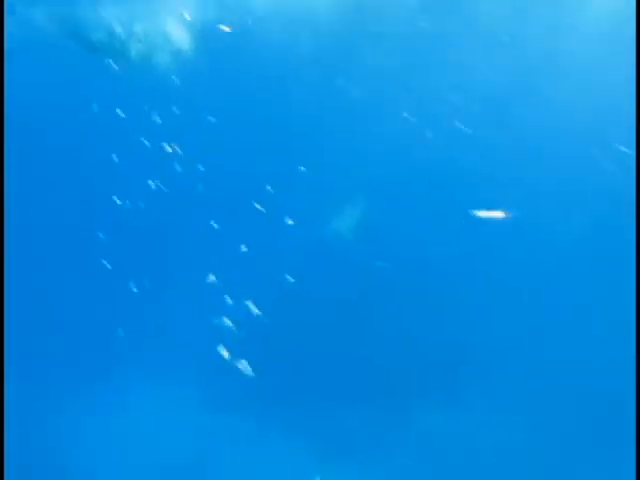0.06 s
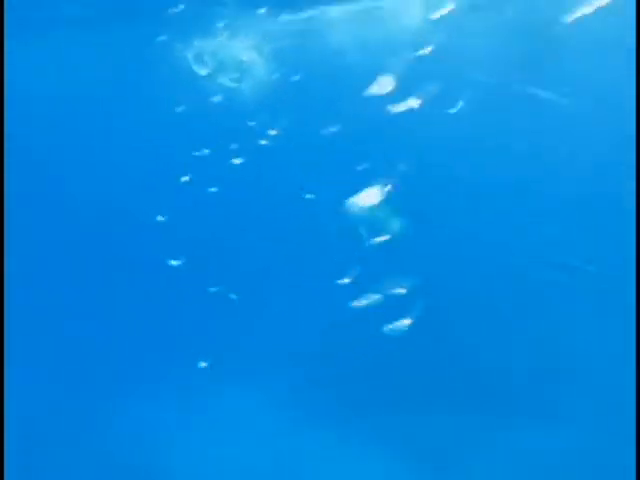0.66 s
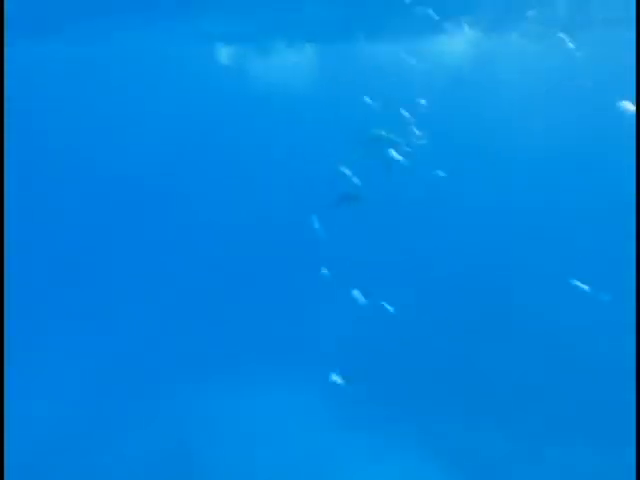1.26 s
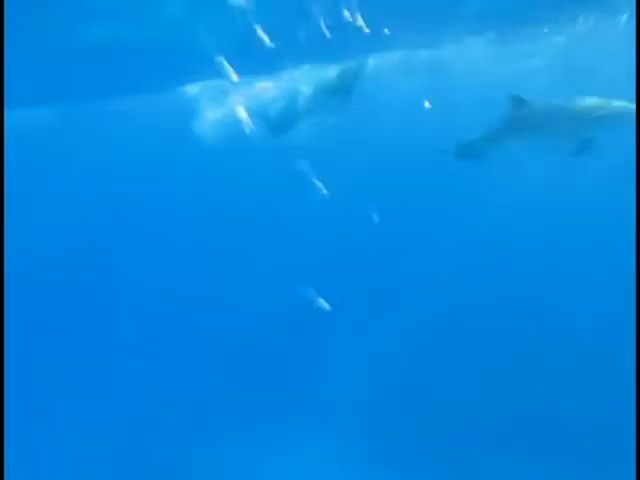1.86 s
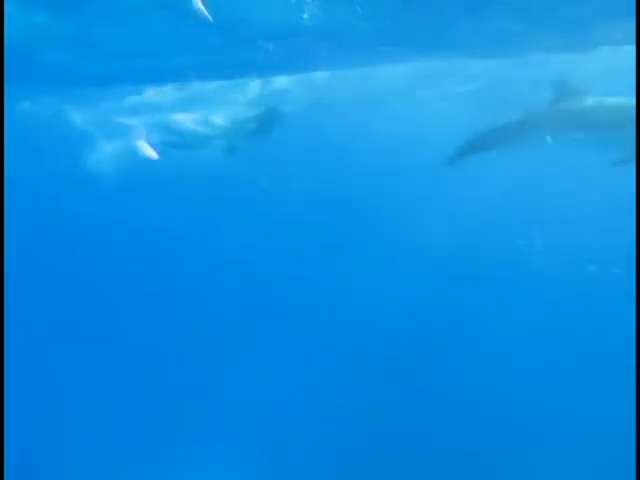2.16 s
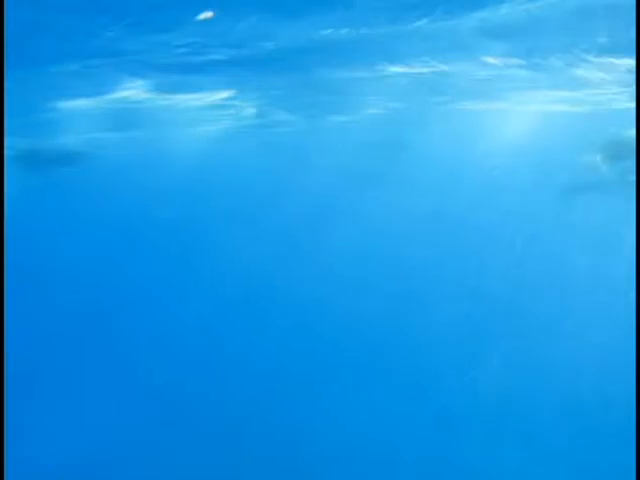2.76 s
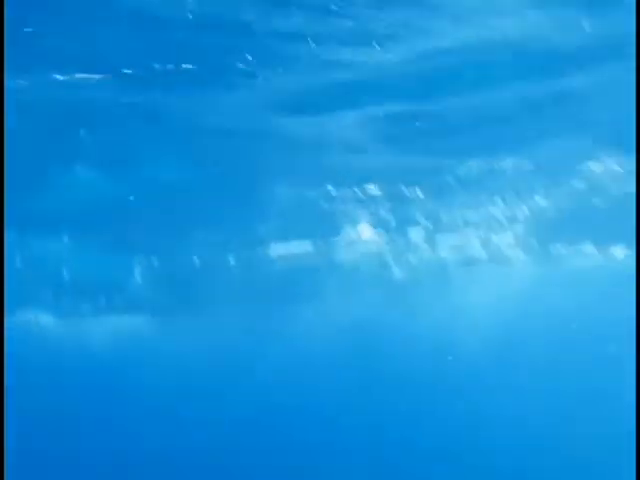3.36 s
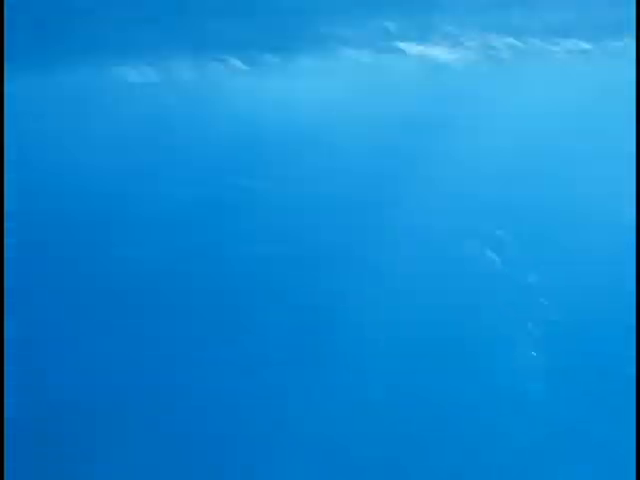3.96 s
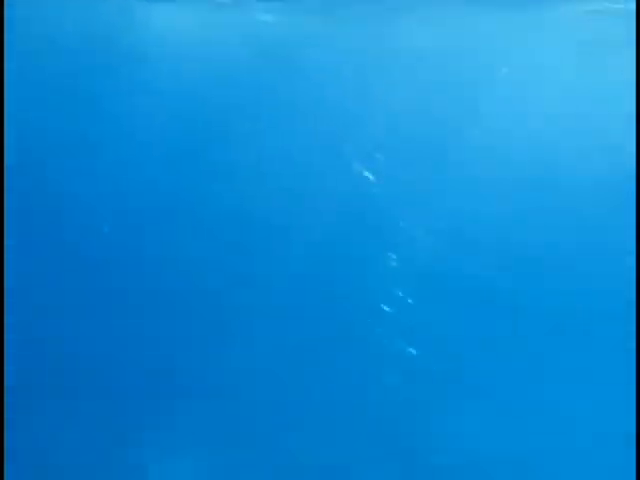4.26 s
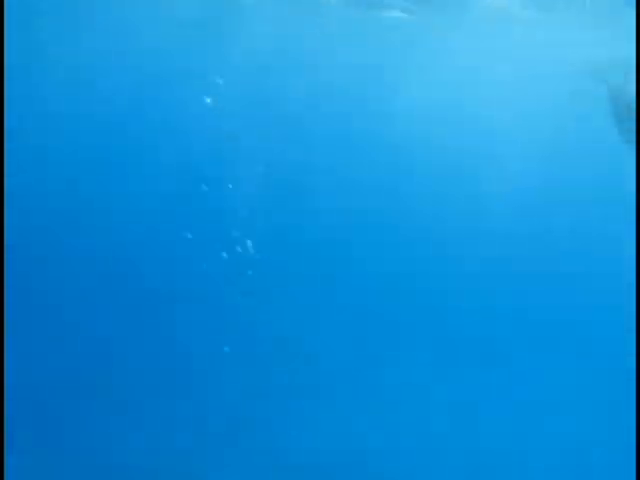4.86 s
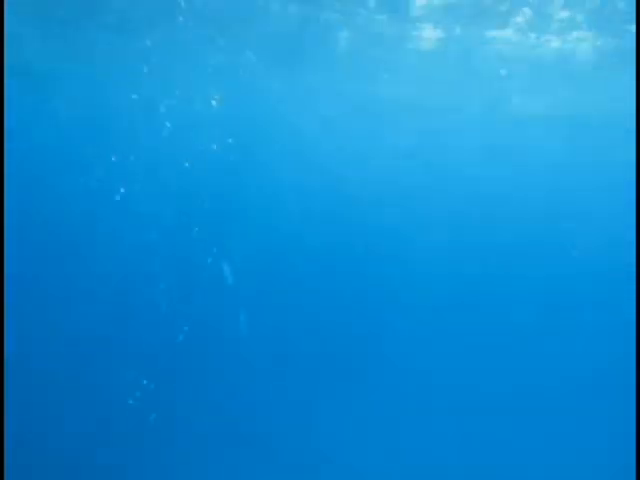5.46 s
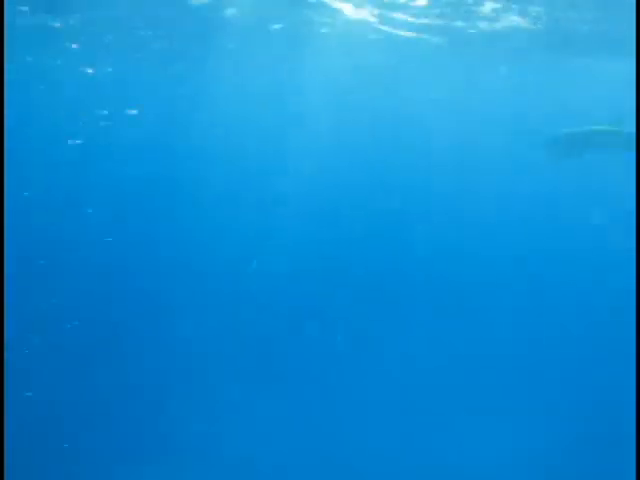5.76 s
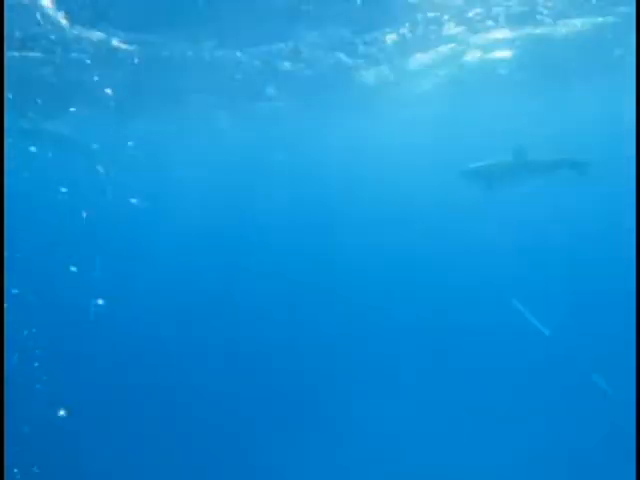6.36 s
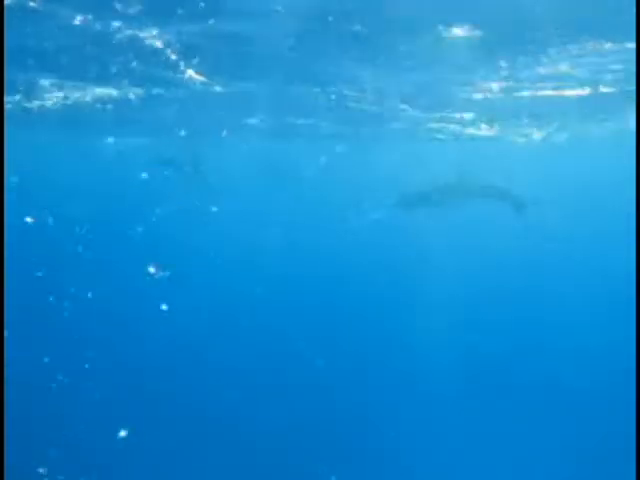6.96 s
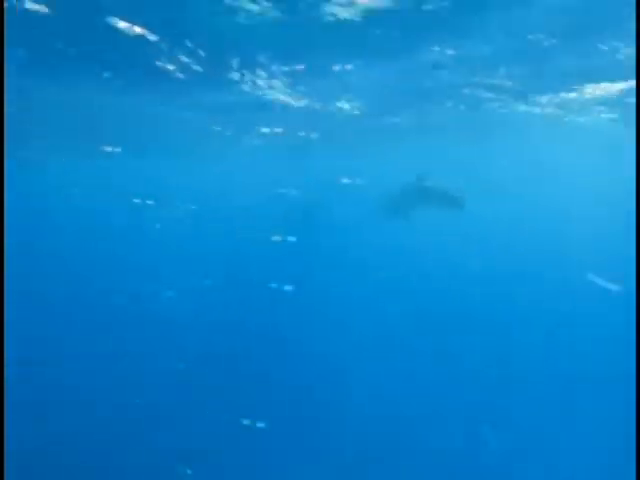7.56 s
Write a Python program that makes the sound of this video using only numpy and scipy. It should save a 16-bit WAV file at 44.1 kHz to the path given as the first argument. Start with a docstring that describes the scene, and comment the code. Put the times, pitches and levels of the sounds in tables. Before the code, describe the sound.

Just under the surface of the open sea, dolphins send out quick trains of sharp clicks with a few faint, thin whistles. Bubbles plop and drops crackle overhead against a steady wash and hiss. Past the middle, a swimmer's stroke churns the water close by in a loud, fizzing gurgle. Then it calms to softer bubbles and more clicks, all heard by a microphone in a watertight housing.

```python
"""Open sea, just under the surface, heard by a swimmer's camera microphone in a watertight housing.
Dolphins whistle and click, near and far; each click rattles briefly in the housing wall.
Bubbles ring, spray fizzes overhead, water slaps the housing and one stroke churns the sea close by.
Under it all lie the wash of the sea and the camera's own hiss, hum and thin whine."""
import sys
import numpy as np
from scipy import signal
from scipy.fft import rfft, irfft
from scipy.io import wavfile
from scipy.ndimage import uniform_filter1d

SR = 44100
rng = np.random.default_rng(int(sys.argv[2]) if len(sys.argv) > 2 else 0)


def digitize_waveform(pressure):
    """Quantize a signal to 16-bit integers and store it at the path in sys.argv[1].

    Rows of a 2-D input are taken as channels; values are limited to [-1, 1].
    """
    field = np.atleast_2d(pressure).T
    bounded = np.clip(field, -1, 1)
    quanta = np.round(bounded * 32767).astype(np.int16)
    wavfile.write(sys.argv[1], SR, quanta)


N = 340011
T = np.arange(N) / SR

# Spectra of the water. Each row: frequency in Hz, relative level in dB.
GURGLE = [(150, -24.5), (300, -9), (380, -5), (430, 0), (510, -10), (600, 0.5), (660, -5), (770, -12),
          (950, -9), (1150, -13.5), (1550, -14), (1900, -19.5), (2600, -32)]  # the low wash
HISS = [(600, -0.5), (950, 8.5), (1150, 4.5), (1520, 12.5), (1750, 6), (2000, 3), (3000, 4), (3900, 3),
        (4600, -1.5), (5000, 5), (5400, 1), (7000, -1.5), (8000, -7), (11000, -33)]  # the broad hiss above it
SPRAY = [(6000, -2), (7600, -5), (8300, 5), (9100, 1.5), (10000, 3), (11000, -6.5), (13000, -10),
         (16000, -11)]  # fine spray
SPURT = [(500, -5.5), (1400, -4.5), (2000, -4.5), (2800, 5), (4000, -1), (5300, 2.5), (7300, -1.5),
         (10000, -2.5), (16000, -23)]  # drops on the surface
CHURN = [(120, -8.5), (280, -7.5), (420, -1), (600, 5), (760, -3), (950, 9), (1200, -0.5), (1500, 10),
         (1950, -16.5), (2800, -1.5), (4300, -19), (5050, -6), (5700, -27), (10000, -4)]  # water churned close by
# Spectra of a click's three parts. Each row: frequency in Hz, relative level in dB.
CLICK_BODY = [(500, -58), (1000, -4), (1500, 11.5), (2100, -2), (2900, 6.5), (3350, 7.5), (3900, 5.5),
              (5200, 6), (6800, 4.5), (9000, -18), (16000, -51)]
CLICK_BRIGHT = [(3000, -28), (5500, -10.5), (7000, -3), (8500, 10.5), (10500, 8.5), (12500, 0), (16000, 1)]
CLICK_EDGE = [(7000, -39), (10500, 0), (12300, 9), (16000, 6)]  # strongest above 12 kHz
# Resonances of the housing wall. Each entry: frequency in Hz.
WALL_HZ = [3320, 3850, 4270]


def undb(db):
    """Decibels to gain."""
    return 10 ** (np.asarray(db) / 20)


def unit(x):
    """Scale to rms 1."""
    return x / np.sqrt(np.mean(x ** 2))


def curves(table):
    """Each column after the first (time in seconds), joined by straight lines."""
    s, *columns = np.transpose(table)
    return [np.interp(T, s, c) for c in columns]


def add(out, s, x):
    """Mix x into out from time s."""
    i = int(np.clip(s * SR, 0, N - 1))
    out[i:i + len(x)] += x[:N - i]


def colour(x, points, size=8192):
    """Causal filter through (Hz, dB) points, falling away outside them."""
    hz, db = np.transpose(points)
    f = np.maximum(np.arange(size // 2 + 1), 1) * SR / size
    octaves_outside = np.maximum(np.log2(hz[0] / f), 0) + np.maximum(np.log2(f / hz[-1]), 0)
    gain = undb(np.interp(np.log(f), np.log(hz), db) - 20 * np.minimum(octaves_outside, 2))
    cepstrum = irfft(np.log(gain))
    cepstrum[1:size // 2] *= 2  # fold to minimum phase
    cepstrum[size // 2 + 1:] = 0
    response = irfft(np.exp(rfft(cepstrum))) * np.hanning(2 * size)[size:]
    return signal.oaconvolve(x, response)[:len(x)]


def walk(rate):
    """Random drift with a spread near 1, turning rate times a second."""
    k = int(SR / rate)
    return uniform_filter1d(np.repeat(rng.standard_normal(N // k + 1), k), k)[:N]


def pops(rate, spread_db):
    """Random impulses, about rate a second, a few much larger than the rest."""
    fires = rng.random(N) < rate / SR
    size = np.minimum(rng.exponential(size=N), 4)
    return fires * undb(spread_db * size) * rng.choice([-1, 1], N)


def swell(start_s, attack_s, hold_s, fall_db_per_s):
    """Gain that builds up, holds, then dies away."""
    rise = np.clip((T - start_s) / attack_s, 0, 1) ** 2
    return rise * undb(-fall_db_per_s * np.maximum(T - start_s - attack_s - hold_s, 0))


def bubble(hz, t60, start_ratio, settle_s=0.0062, rise_s=0.00056):
    """A pocket of air rings and settles to its pitch as it leaves the surface."""
    t = np.arange(int(max(t60, .002) * SR)) / SR
    pitch = hz * (1 + (start_ratio - 1) * np.exp(-t / settle_s))
    envelope = np.exp(-np.log(1000) * t / t60) * (1 - np.exp(-t / rise_s))
    return np.sin(2 * np.pi * np.cumsum(pitch) / SR) * envelope


def swarm(lo_hz, hi_hz, cycles, spread_db, span_s, count):
    """Many small bubbles of random size, born at random moments."""
    out = np.zeros(N)
    for when, size, force, glide in rng.random((count, 4)):
        s = span_s[0] + when * (span_s[1] - span_s[0])
        hz = lo_hz * (hi_hz / lo_hz) ** size
        gain = undb(-spread_db * np.log(max(force, .03))) * rng.choice([-1, 1])
        add(out, s, gain * bubble(hz, cycles / hz, start_ratio=0.89 + 0.49 * glide))
    return out


def sea(rumble_db=1.7, gurgle_db=2.0, foam_db=1.9, hiss_db=4.5, spray_db=2.5, bubbly=0.11):
    """Open water all round: rumble, a wash with small bubbles, ringing foam, hiss and fine spray."""
    # The sea's rise and fall. Each row: time in seconds, then rumble, gurgle, foam, hiss and spray
    # in relative dB.
    levels = [(0, -59, -50.5, -52, -55, -55), (.75, -57.5, -48.5, -52, -57, -56),
              (1.4, -58, -52.5, -47, -58.5, -53), (1.9, -57, -55, -53, -55, -55.5),
              (2.2, -57.5, -52.5, -53, -56, -54), (2.5, -58.5, -50.5, -48, -56, -52.5),
              (2.9, -58.5, -51.5, -50.5, -53.5, -50), (3.13, -56, -48, -44.5, -49.5, -47.5),
              (3.35, -55.5, -56.5, -51.5, -50.5, -52.5), (3.8, -56, -51, -48.5, -50.5, -51.5),
              (4.25, -56.5, -53.5, -44, -48, -49.5), (4.8, -59, -40, -45.5, -51, -48.5),
              (5.22, -50.5, -46, -54, -51, -50), (5.4, -57, -53, -60.5, -58, -60),
              (5.63, -58, -49.5, -59, -54.5, -58.5), (6.1, -58.5, -59.5, -65.5, -54.5, -57.5),
              (7.25, -57.5, -52.5, -63.5, -55, -58.5), (7.71, -58.5, -56.5, -59.5, -58, -47.5)]
    # Spectra of the rumble and the foam. Each row: frequency in Hz, relative level in dB.
    rumble_spectrum = [(12, -37), (20, 2.5), (188, -6.5), (255, -8.5), (280, -6.5), (308, -16), (330, -18),
                       (430, -27), (730, -120)]
    foam_spectrum = [(1500, -21.5), (2000, -24), (2250, -6), (2480, 3), (2600, -5.5), (2850, 6), (3020, -5),
                     (3150, -16), (3330, 0.5), (3550, -12), (3800, -4), (4080, -19), (4290, -2),
                     (4700, -21)]
    rumble, gurgle, foam, hiss, spray = curves(levels)
    noise = rng.standard_normal((5, N))
    small = bubbly * unit(swarm(305.5, 1810, cycles=15, spread_db=5.8, span_s=(0, N / SR), count=1800))
    layers = (
        (noise[0], rumble_spectrum, rumble + rumble_db + 1.2 * walk(7.5)),
        (small + noise[1], GURGLE, gurgle + gurgle_db + 0.25 * walk(21)),
        (unit(pops(1200, 5.0)) + 1.7 * noise[2], foam_spectrum, foam + foam_db + 1.16 * walk(25.01)),
        (unit(pops(700, 4.6)) + noise[3] + small, HISS, hiss + hiss_db + 0.7 * walk(25)),
        (unit(pops(350, 1.3)) + 0.85 * noise[4], SPRAY, spray + spray_db + 1.6 * walk(31)))
    return sum(unit(colour(source, spectrum)) * undb(db) for source, spectrum, db in layers)


def far_clicks(rate=30, level_db=-62, ring_s=.001, body=0.19, size=256):
    """The rest of the pod ticks away in the distance."""
    wall = rng.standard_normal(size) * np.exp(-np.arange(size) / SR / ring_s)
    ticks = signal.oaconvolve(pops(rate, 1.7), wall)[:N]
    return undb(level_db) * unit(colour(ticks, CLICK_BRIGHT) + body * colour(ticks, CLICK_BODY))


def rattle(bright_db, body_db, edge_db, mode_hz, crossing_s=0.0016, ring_s=0.0019, fade_s=0.0087,
           tail=0.045, tail_s=0.0063, stir_db=-20, mode_q=7, mode_gain=1.95, size=512):
    """A sharp pulse bounces through the housing wall, rings one of its resonances and dies."""
    t = np.arange(size) / SR
    envelope = np.exp(-np.maximum(t - crossing_s, 0) / ring_s - t / fade_s) + tail * np.exp(-t / tail_s)
    bounces = rng.standard_normal(size) * envelope
    bright, body, edge = (colour(bounces, p, size=512) for p in (CLICK_BRIGHT, CLICK_BODY, CLICK_EDGE))
    body = body + mode_gain * signal.lfilter(*signal.iirpeak(mode_hz, mode_q, fs=SR), body)
    body_gain = undb(body_db) + undb(bright_db + stir_db)  # even a bright pulse stirs the lower modes
    parts = (bright, undb(bright_db)), (body, body_gain), (edge, undb(edge_db))
    return sum(gain * part / np.abs(part).max() for part, gain in parts)


def near_clicks(bright_db=2.5, body_db=1.5, edge_db=29.0):
    """The nearest dolphins' echolocation clicks strike the housing; the tone shifts as the beam turns."""
    # Trains of about twelve clicks a second. Each row: start in seconds, relative peak in dB.
    trains = [(0.0725, -23), (0.1615, -24), (0.2643, -22), (0.3683, -23.5), (0.469, -25), (0.484, -24),
              (0.5704, -20), (0.6561, -23.5), (0.6845, -28), (0.7563, -25), (0.787, -30), (0.896, -33),
              (0.9762, -20), (0.9971, -33), (1.055, -21), (1.1054, -33), (1.1343, -21), (1.2132, -21.5),
              (1.2938, -24.5), (1.3094, -32), (1.3738, -27.5), (1.4207, -31), (1.448, -27.5),
              (1.521, -27.5), (1.5394, -28), (1.5943, -25), (1.6576, -34), (1.6748, -25.5), (1.7564, -33),
              (1.845, -31), (1.956, -33.5), (2.0562, -33), (2.1338, -29), (2.2543, -33), (2.3521, -35),
              (2.4743, -32.5), (3.1941, -31.5), (3.3643, -30), (3.3997, -33), (3.4425, -31), (3.482, -24.5),
              (3.714, -25.5), (3.7842, -26.5), (3.8392, -29), (3.9915, -28), (4.0577, -26), (4.1188, -24.5),
              (4.1819, -25), (4.246, -23), (4.318, -21.5), (4.8025, -25), (4.9926, -26), (5.353, -27.5),
              (6.234, -33.5), (6.32, -29), (6.3976, -25), (6.479, -26), (6.5582, -26.5), (6.6318, -28),
              (6.7076, -31), (6.7727, -32.5), (6.826, -31.5), (7.5137, -23)]
    # Tone as the animals turn. Each row: time in seconds, body offset in dB, edge offset in dB.
    tone = [(0.1, -14, -28), (.6, -12.5, -30), (1.25, -29, -30), (1.75, -35, -31), (2.15, -1, -28),
            (3.3, -22, -32), (3.95, 1.5, -30), (4.2, -19, -31), (6.25, 0.5, -34), (6.45, -13.5, -41),
            (7.5, -9, -32)]
    when, body_offsets, edge_offsets = np.transpose(tone)
    out = np.zeros(N)
    for s, db in trains:
        body = db + body_db + np.interp(s, when, body_offsets)
        edge = db + edge_db + np.interp(s, when, edge_offsets)
        add(out, s, rattle(db + bright_db, body, edge, rng.choice(WALL_HZ)))
    return out


def near_bubbles(level_db=-1, scatter=0.34, scatter_s=0.006, crack=0.68, crack_s=0.0039, size=2048):
    """Large bubbles pinch off close by with a crack and a ring, which scatters from the surface."""
    # Single bubbles. Each row: start in seconds, final pitch in Hz, relative level in dB,
    # seconds to fall 60 dB.
    pockets = [(.091, 1010, -30.5, 0.079), (1.171, 1500, -22.5, .008), (1.254, 3050, -26.5, 0.028),
               (1.261, 1310, -23.5, 0.052), (1.262, 945, -27.5, 0.12), (1.902, 1470, -22.5, .022),
               (1.903, 940, -34, .04), (2.32, 1540, -33.5, 0.032), (2.81, 820, -35.5, 0.083),
               (2.907, 1315, -19, 0.036), (3.038, 585, -21.5, 0.04), (3.0595, 1400, -17.5, 0.016),
               (3.06, 389, -14, 0.022), (3.074, 270, -29.5, 0.072), (3.149, 105.5, -33, 0.17),
               (3.209, 606, -30.5, 0.14), (3.34, 2260, -31, 0.053), (3.355, 1502, -27.5, 0.085),
               (3.658, 1274, -29.5, .07), (3.656, 560, -20.5, 0.014), (3.784, 807, -30, 0.11),
               (4.322, 910, -25, 0.06), (4.387, 1360, -23, 0.025), (4.409, 567, -16.5, 0.074),
               (4.412, 885, -16.5, 0.036), (4.495, 590, -17.5, 0.1), (4.525, 100, -28, 0.056),
               (4.539, 385, -15, 0.063), (4.613, 1390, -14.5, 0.03), (4.641, 1486, -18.5, 0.04),
               (4.7082, 590, -9.5, 0.046), (4.71, 876, -17.5, 0.057), (4.794, 443.4, -23, 0.2),
               (4.824, 385, -18.5, 0.051), (5.062, 58, -33.5, 0.25), (5.2485, 1050, -15, 0.01),
               (5.249, 590, -14.5, 0.034), (5.549, 860, -35, 0.076), (5.888, 944, -28.5, 0.034),
               (6.132, 800, -35.5, 0.046), (6.161, 1280, -35, .042), (6.19, 1130, -31, 0.076),
               (6.19, 356, -38.5, 0.18), (6.927, 1366, -33.5, 0.047), (7.236, 1004, -37, .061),
               (7.654, 330, -39, .28), (7.661, 1344, -26, 0.055), (7.678, 1010, -20, 0.038),
               (7.687, 581, -24, .37)]
    out, t = np.zeros(N), np.arange(size) / SR
    for s, hz, db, t60 in pockets:
        ring = bubble(hz, t60, start_ratio=1.072)
        burst = rng.standard_normal(size) * np.exp(-t / crack_s)
        snap = colour(burst, [(hz / 2, -4), (hz, 0), (2 * hz, -5), (4 * hz, -16)], size=512)
        surface = rng.standard_normal(size) * t * np.exp(-2 * t / scatter_s)
        echo = signal.fftconvolve(ring, surface)
        echo *= np.linalg.norm(ring) / np.linalg.norm(echo)
        for part in (ring, crack * snap / np.abs(snap).max(), scatter * echo):
            add(out, s, undb(db + level_db) * part)
    return out


def whistles(level_db=-2, attack_s=0.0027, release_s=0.022, waver=0.018, twinkle_db=8.0,
             direct=0.41, reflected=1.45, echo_s=0.011, size=4096):
    """Thin dolphin whistles glide along arcs and arrive smeared by reflections from the waves."""
    # One arc a whistle. Each row: start and length in seconds, first, middle and last pitch in Hz,
    # relative level in dB.
    arcs = [(.16, .14, 10700, 8460, 10000, -59), (0.468, .12, 9960, 7530, 10000, -51),
            (0.564, .095, 10100, 10900, 11300, -53), (2.112, 0.14, 8100, 10100, 10900, -59),
            (2.247, 0.31, 6300, 7280, 7100, -64), (5.227, 0.013, 7800, 8700, 9300, -30),
            (5.23, 0.017, 9040, 10400, 10900, -21), (5.252, 0.019, 10600, 9040, 8640, -31),
            (7.2, .11, 7340, 8660, 9700, -66), (7.491, 0.1, 10300, 10150, 10700, -44.5)]
    tones = np.zeros(N)
    wobble = 1 + waver * walk(500)
    twinkle = twinkle_db * walk(110)
    for s, length, first, middle, last, db in arcs:
        u = np.clip((T - s) / length, 0, 1)
        hz = first + (last - first) * u + 2 * (2 * middle - first - last) * u * (1 - u)
        phase = 2 * np.pi * np.cumsum(hz * wobble) / SR
        fade = np.clip(np.minimum((T - s) / attack_s, (s + length - T) / release_s), 0, 1)
        tones += fade * undb(db + level_db + twinkle) * np.sqrt(2) * np.sin(phase)
    waves = rng.standard_normal(size) * np.exp(-np.arange(size) / SR / echo_s)
    return direct * tones + reflected * signal.oaconvolve(tones, waves / np.linalg.norm(waves))[:N]


def snaps(bright_db=1, body_db=-1, edge_db=16):
    """Drops and bursting air snap near the housing and ring its wall with a full body."""
    # Sharp pulses. Each row: start in seconds, bright part, body and edge in relative dB,
    # strongest wall resonance in Hz.
    pulses = [(.58, -23, -41, -53, 3300), (.821, -39, -28, -68, 3330), (1.02, -17, -22.5, -36, 4950),
              (1.6304, -46, -24, -63, 5000), (2.261, -27, -29, -59, 4270), (2.27, -30, -25, -62, 5100),
              (2.831, -12.5, -17.5, -27, 3240), (2.8409, -17, -19.5, -49, 5050),
              (2.87, -22, -26, -50, 3350), (3.1366, -13, -34, -54, 3350), (3.5741, -41, -20, -59, 5050),
              (3.579, -41, -25, -49, 5100), (3.605, -31, -18, -46, 5400), (3.6482, -11, -19, -29, 5230),
              (3.7464, -34, -27, -64, 5100), (3.7687, -24.5, -32, -55, 5100), (3.861, -26, -28, -55, 3950),
              (3.8862, -28, -23, -44, 5350), (3.9045, -12, -18.5, -41, 5000), (4.04, -23, -28, -58, 5130),
              (4.3998, -22, -21.5, -53, 3350), (4.4857, -2, -16.5, -22, 5000),
              (4.6942, -17, -20, -45, 3250), (4.7188, -11, -14, -37, 4970), (4.7378, -26, -22, -59, 5050),
              (5.041, -30, -23.5, -63, 5500), (5.963, -31, -31, -52, 5000), (5.988, -18, -22.5, -48, 4960),
              (6.0343, -34, -33, -62, 5170), (6.0544, -34, -31.5, -61, 3750), (6.1529, -33, -31, -63, 3150),
              (6.6154, -34, -34, -61, 3200), (7.2842, -23, -21, -55, 3420), (7.347, -17.5, -23, -54, 3400),
              (7.424, -32, -32.5, -55, 3350)]
    out = np.zeros(N)
    for s, bright, body, edge, hz in pulses:
        add(out, s, rattle(bright + bright_db, body + body_db, edge + edge_db, hz))
    return out


def knocks(gain=0.98, rebound=1.1):
    """Soft bumps right at the microphone dent the housing, which then springs back."""
    # Bumps. Each row: centre in seconds, relative level in dB, push width and recovery in seconds.
    bumps = [(1.138, -8.5, 0.0011, 0.0097), (3.079, -30, 0.0047, 0.011), (3.17, -43, 0.0042, .008),
             (4.531, -20, 0.0015, .006)]
    out = np.zeros(N)
    for s, db, width, recovery in bumps:
        push = np.exp(-((T - s) / width) ** 2)
        leak = np.exp(-1 / (recovery * SR))
        spring = signal.lfilter([1 - leak], [1, -leak], push)
        out -= gain * undb(db) * (push - rebound * spring)
    return out


def sloshes(level_db=-2, rise_s=0.0015):
    """Water slaps the housing and churns briefly."""
    # Slaps of water. Each row: start in seconds, relative level in dB, decay in seconds.
    slaps = [(1.256, -30, 0.013), (1.901, -35, 0.02), (3.06, -46, 0.039), (3.128, -36.5, 0.028),
             (3.648, -45, 0.01), (4.384, -20.5, 0.026), (4.706, -44, .015), (5.25, -32, 0.026),
             (5.55, -62, .04), (6.056, -35, 0.014), (6.149, -39, 0.019), (6.19, -43, 0.11),
             (6.90, -42, 0.041), (7.655, -35, 0.17)]
    force, t = np.zeros(N), np.arange(SR // 2) / SR
    for s, db, decay in slaps:
        add(force, s, undb(db + level_db) * (1 - np.exp(-t / rise_s)) * np.exp(-t / decay))
    froth = unit(pops(900, 6.6)) + rng.standard_normal(N)
    return force * unit(colour(froth, CHURN))


def spurts(mist=0.52):
    """Drops patter on the surface just overhead in short crackling showers."""
    # Showers. Each row: centre in seconds, half length in seconds, level in dB.
    showers = [(1.638, 0.0049, -33), (2.272, 0.011, -48), (2.868, 0.044, -36.5), (3.137, 0.0065, -32.5),
               (3.535, 0.013, -28.5), (3.58, 0.0038, -31), (3.613, 0.0033, -36), (3.635, 0.025, -31),
               (3.896, 0.016, -31.5), (4.489, 0.018, -28.5), (5.974, 0.028, -43), (7.358, 0.02, -47)]
    envelope = sum(undb(db) * np.exp(-((T - s) / half) ** 2 / 2) for s, half, db in showers)
    drops = unit(pops(5000, 7.6)) + mist * rng.standard_normal(N)
    return envelope * unit(colour(drops, SPURT))


def sizzle(level_db=-46):
    """Dense fine ticks swell and fade, ringing near the top of the housing's range."""
    # Spectrum of the ticks. Each row: frequency in Hz, relative level in dB.
    spectrum = [(7000, -11), (8200, -13), (8750, -6), (9250, -10), (9850, 3), (10400, -11), (11000, -17),
                (13000, -22)]
    envelope = swell(start_s=2.33, attack_s=0.39, hold_s=.08, fall_db_per_s=110)
    return envelope * undb(level_db) * unit(colour(pops(4000, 1.8), spectrum))


def stroke(start_s=4.31, bubbling_s=.8, cloud_db=-32.5, rumble_db=-30, wash_db=-30, hiss_db=-36,
           spray_db=-41, mist_db=-54, froth=0.87, crackle_db=-11):
    """A close stroke drags air under: a bubble cloud crackles and hisses, and a heave of water follows."""
    air = swell(start_s, attack_s=0.078, hold_s=0.23, fall_db_per_s=57)
    push = swell(start_s=4.45, attack_s=.075, hold_s=.05, fall_db_per_s=67)
    cloud = swarm(196, 2660, cycles=15, spread_db=3.6, span_s=(start_s, start_s + bubbling_s), count=450)
    cloud = unit(cloud) * np.sqrt(bubbling_s * SR / N)  # rms near 1 while it bubbles
    cloud = 1.55 * colour(cloud + froth * rng.standard_normal(N), CHURN)
    crackle = undb(crackle_db) * unit(colour(pops(120, 2.9), SPURT))
    fizz = sum(undb(db) * unit(colour(unit(pops(700, 6.7)) + rng.standard_normal(N), spectrum))
               for spectrum, db in ((HISS, hiss_db), (SPRAY, spray_db), (CLICK_EDGE, mist_db)))
    # Spectrum of the heave. Each row: frequency in Hz, relative level in dB.
    heave_spectrum = [(25, -20), (55, 5), (90, -8), (125, 2), (170, -10.5), (255, 0), (400, -20)]
    heave = undb(rumble_db) * unit(colour(rng.standard_normal(N), heave_spectrum))
    wash = undb(wash_db) * unit(colour(rng.standard_normal(N), GURGLE))
    return air * (undb(cloud_db) * (cloud + crackle) + fizz) + push * (heave + wash)


def far_bubbles(level_db=-56):
    """Further off, stray bubbles rise in the wake of the stroke and plop softly."""
    return undb(level_db) * swarm(449, 1560, cycles=43, spread_db=3.5, span_s=(5.4, 7.4), count=70)


def thin_clicks(start_s=6.994, gap_s=.0803, quicken_s=.00243, count=11):
    """A dolphin further off arrives as faint, very high ticks, each gap shorter than the last."""
    out, s = np.zeros(N), start_s
    for k in range(count):
        add(out, s, rattle(bright_db=-36, body_db=-52, edge_db=-35, mode_hz=rng.choice(WALL_HZ)))
        s += gap_s - k * quicken_s
    return out


def scene():
    """Everything that reaches the housing, in mono."""
    dolphins = near_clicks() + thin_clicks() + far_clicks() + whistles()
    water = near_bubbles() + far_bubbles() + snaps() + sloshes() + spurts() + sizzle() + stroke() + sea()
    return (dolphins + water + knocks())[None]


def record(dry):
    """The microphone hears through the housing; the camera adds whine, hum and hiss and cuts the top."""
    # The housing passes little above 11 kHz. Each row: frequency in Hz, gain in dB.
    housing = [(20, 0.5), (10900, -2), (11400, -6.5), (11800, -26), (12200, -11), (14000, -12.5),
               (16000, -24)]
    # The camera's own hiss. Each row: frequency in Hz, relative level in dB.
    self_noise = [(3000, -18), (10500, -9), (11800, -16), (12500, -2), (14000, -1), (16000, -6)]
    whine_hz, hum_hz, cutoff_hz = 5880, 432, 16200
    whine_db, hum_db, hiss_db = -59, -65, -68.5
    whine = np.sqrt(2) * undb(whine_db) * np.sin(2 * np.pi * whine_hz * T + 0.13 * walk(90))
    hum = np.sqrt(2) * undb(hum_db) * np.sin(2 * np.pi * hum_hz * T + 0.86 * walk(14))
    hiss = undb(hiss_db) * unit(colour(rng.standard_normal(N), self_noise))
    inside = colour(dry[0], housing) + whine + hum + hiss
    lowpass = signal.ellip(10, .2, 85, cutoff_hz, fs=SR, output="sos")
    return signal.sosfilt(lowpass, inside)[None]


dry = scene()
out = record(dry)
digitize_waveform(out)
```